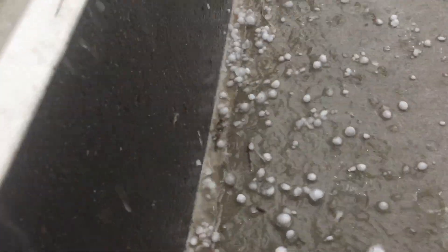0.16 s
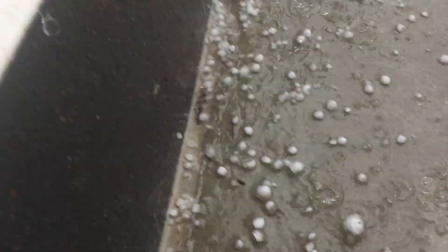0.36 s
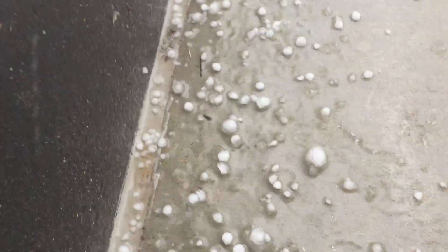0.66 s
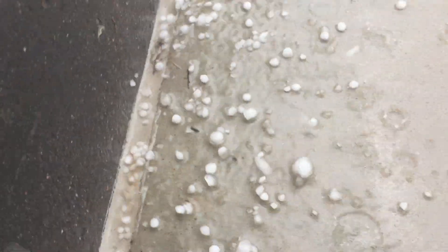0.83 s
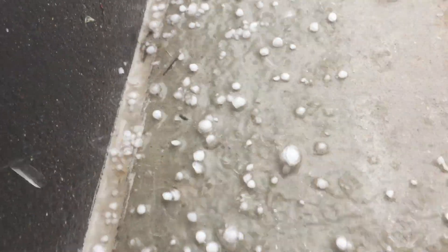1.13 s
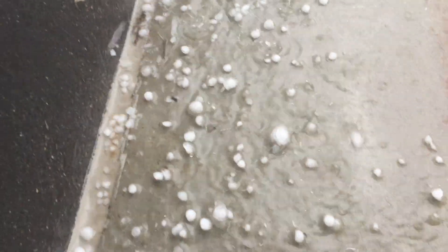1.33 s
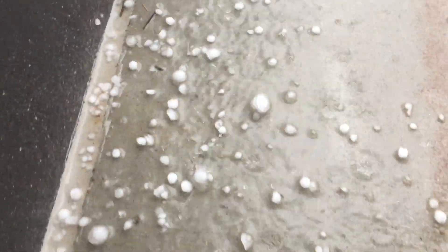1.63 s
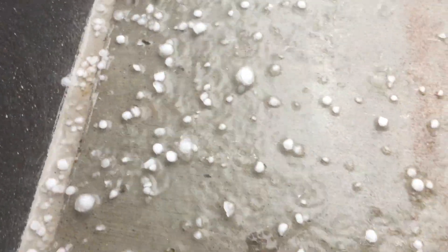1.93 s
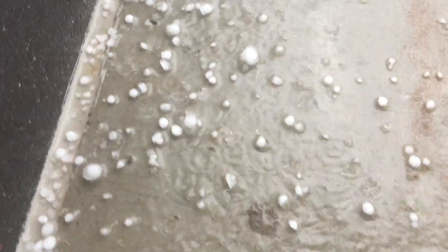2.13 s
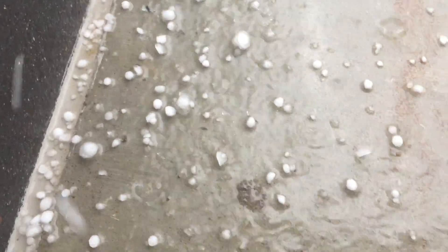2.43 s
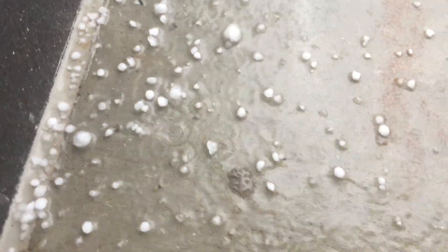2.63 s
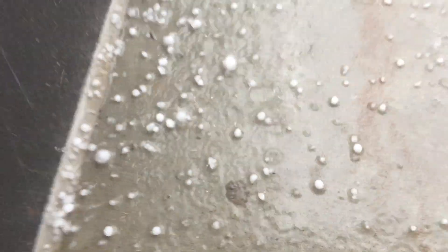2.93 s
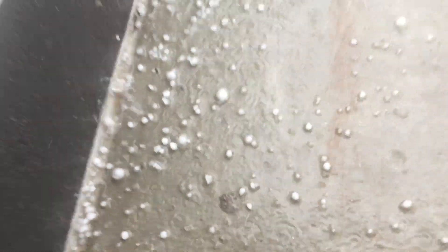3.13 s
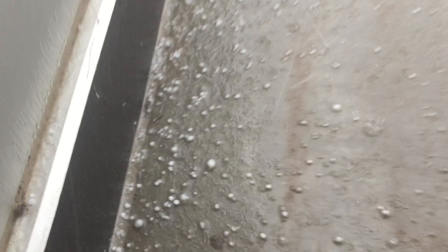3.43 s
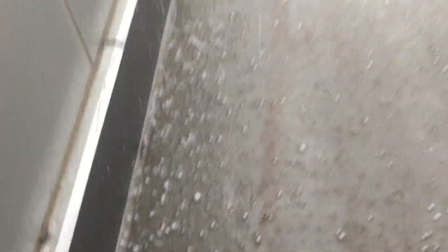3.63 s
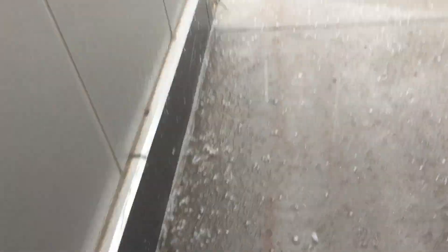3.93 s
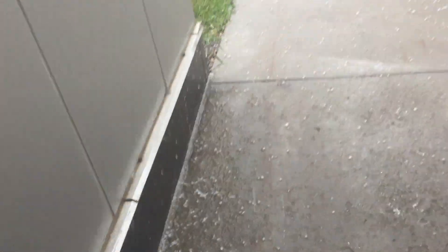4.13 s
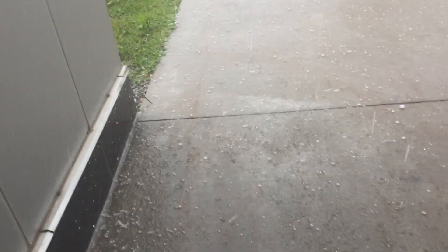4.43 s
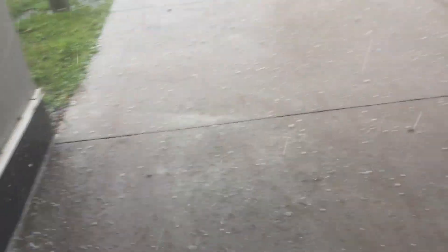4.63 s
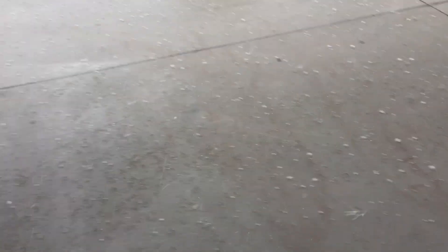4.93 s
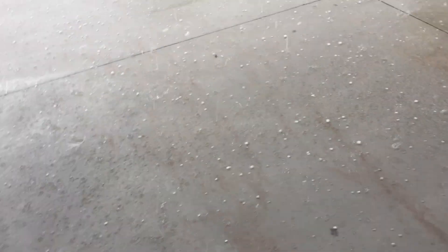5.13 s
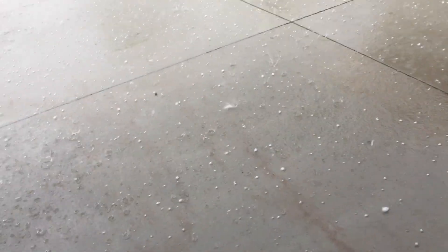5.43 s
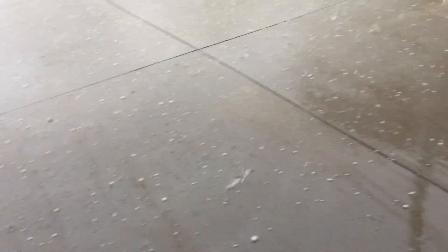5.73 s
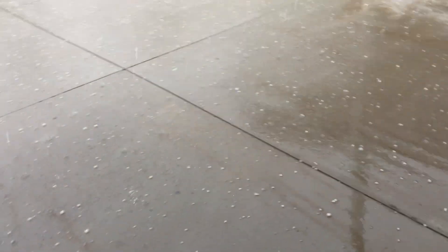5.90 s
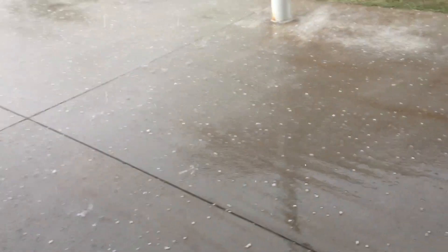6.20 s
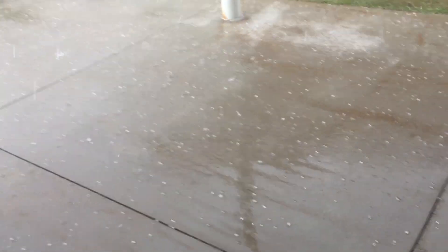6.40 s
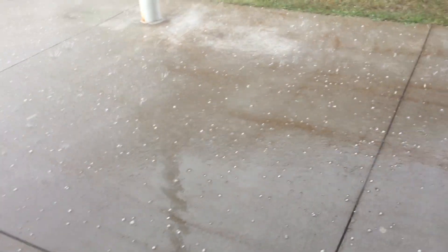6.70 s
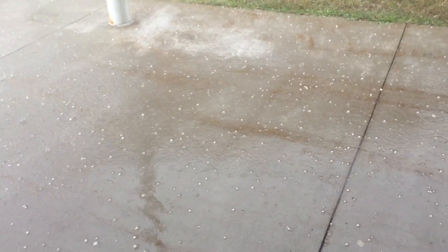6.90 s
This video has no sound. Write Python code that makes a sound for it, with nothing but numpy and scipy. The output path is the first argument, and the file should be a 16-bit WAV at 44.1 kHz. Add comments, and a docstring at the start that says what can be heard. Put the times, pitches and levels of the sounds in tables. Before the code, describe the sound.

A dry, close outdoor phone pickup of hail and heavy rain at a doorstep, lasting about 7 seconds. Throughout, countless distant stones merge into a crisp, grainy patter over rain hiss, swelling slightly. Nearby hailstones crack, tick and ping irregularly on wet concrete, with tiny splashes. Strong hollow sill clacks come at about 0.15-0.2 s, with more around 0.6 and 0.95 s. The loudest crack, at 1.8 s, brings a short, low door-panel thud and slightly overloads the microphone. Close hits cluster from 2.1 to 2.8 s. Low wind rumbles underneath; rough buffets press on the microphone from 2.8 to 4.1 s, strongest near 3.3-3.7 s, with a hard crack at 3.65 s. A metal post hums faintly on one fading note. After 4.4 s close hits gradually thin, near ticks recede, and brief soft wind puffs appear as rain continues to the end.

```python
"""Hail on a concrete walk and a door sill, in heavy rain, close to a phone microphone.
Near stones are decaying sines with noise cracks and splashes; sill modes ring with them, a door panel thuds once.
Far stones merge into a patter over shaped-noise rain; a metal post hums faintly as a decaying sine.
Wind on the microphone port is low noise with puffs and buffets; the loudest peaks softly overload the input."""
import sys
import numpy as np
from scipy.fft import rfft, irfft, next_fast_len
from scipy.io import wavfile
from scipy.ndimage import uniform_filter1d, map_coordinates

SR = 44100
rng = np.random.default_rng(int(sys.argv[2]) if len(sys.argv) > 2 else 0)


def generate_wav(sig):
    """Save sig (samples, or channels by samples) to the path in sys.argv[1] as 16-bit PCM at SR."""
    pcm = np.round(np.clip(np.atleast_2d(sig).T, -1, 1) * 32767).astype(np.int16)
    wavfile.write(sys.argv[1], SR, pcm)


N = 311346


def amp(db):
    """Amplitude ratio of a level in dB."""
    return 10 ** (np.asarray(db) / 20)


def unit(x):
    """x scaled to an RMS of one."""
    return x / np.sqrt(np.mean(x ** 2) + 1e-20)


def curves(rows):
    """One value per sample for each column after the time in seconds."""
    knot_s, *columns = np.transpose(rows)
    return [np.interp(np.arange(N) / SR, knot_s, column) for column in columns]


def wobble(rate_hz):
    """A smooth random curve through rate_hz normal draws a second."""
    knots = rng.standard_normal(int(N * rate_hz / SR) + 4)
    return map_coordinates(knots, [np.arange(N) * rate_hz / SR])


def filtered(x, response):
    """x times a response, a function of frequency in Hz."""
    size = next_fast_len(N + 8192)
    spectrum = rfft(x, size) * response(np.fft.rfftfreq(size, 1 / SR))
    return irfft(spectrum, size)[..., :N]


def coloured(x, points):
    """x shaped by (Hz, dB) points on a log axis, at unchanged power for white input."""
    point_hz, point_db = np.transpose(points)
    return filtered(x, lambda hz: unit(amp(np.interp(np.log(hz + 1), np.log(point_hz), point_db))))


def impacts(s, db, hz, crack_db, cycles, life_s, size):
    """Each stone rings for some cycles to -60 dB, cracks dull or bright, then scatters chips and water."""
    # Spectrum of shattering ice. Each row: frequency in Hz, relative density in dB.
    crack_points = [(300, -6.5), (1000, -7.5), (2500, 2), (6000, 2), (12000, -2.5), (16000, -7.5)]
    # Spectrum of scattering chips and water. Each row: frequency in Hz, relative density in dB.
    splash_points = [(500, -20), (1500, 4), (4000, 3.5), (9000, -7), (16000, -19)]
    bright_hz = 5560  # splits cracks into a dull and a bright part
    t = np.arange(size) / SR
    s, db, hz, crack_db = (np.asarray(column)[:, None] for column in (s, db, hz, crack_db))
    at = (np.round(s * SR).astype(int) + np.arange(size)).ravel()

    def mix(grains):
        """Overlap-add of the grains at their starts."""
        return np.bincount(at, grains.ravel(), N + size)[:N]

    ring = amp(db - 60 * t * hz / cycles) * np.sin(2 * np.pi * hz * t)
    crack_t60_s = life_s * amp(rng.normal(0, 4.4, hz.shape))  # some cracks are mere ticks
    crack = amp(db + crack_db - 60 * t / crack_t60_s) * rng.standard_normal(ring.shape)
    # small, high stones crack brighter
    tilt_db = 4.1 * np.log2(hz / 3500) + rng.normal(0, 5.2, hz.shape)
    dull = filtered(mix(crack * amp(-tilt_db / 2)), lambda f: 1 / (1 + (f / bright_hz) ** 4))
    bright = filtered(mix(crack * amp(tilt_db / 2)), lambda f: 1 - 1 / (1 + (f / bright_hz) ** 4))
    splash = amp(db - 12 - 60 * t / 0.032) * rng.standard_normal(ring.shape)
    return mix(ring) + coloured(dull + bright, crack_points) + coloured(mix(splash), splash_points)


def far_stones(count, spread_db, centre_hz, crack_db, life_s):
    """A random fall of smaller and farther stones, some louder than the rest, at unit RMS."""
    draw, scatter = rng.random((count, 2)), rng.standard_normal((count, 2))
    start_s = draw[:, 0] * N / SR
    db = -spread_db * np.log(1 - .96 * draw[:, 1])
    hz = np.clip(centre_hz * np.exp(.55 * scatter[:, 0]), 1000, 12000)
    cracks_db = crack_db + 3.4 * scatter[:, 1]
    return unit(impacts(start_s, db, hz, cracks_db, cycles=14, life_s=life_s, size=768))


def downpour():
    """Rain on wet concrete as patchy noise under far stones; the hiss swells more than the patter."""
    # Strength of the downpour. Each row: time in seconds, gain in dB.
    fall = [(0, -28), (.2, -29.5), (.25, -33.5), (.35, -35), (.41, -30), (.9, -30), (1.07, -32), (1.2, -30),
            (1.75, -28), (2.0, -35.5), (2.06, -28.5), (2.25, -31.5), (2.68, -27.5), (2.9, -31.5),
            (3.3, -29), (3.5, -33.5), (4.35, -29), (4.5, -30.5), (5.9, -29), (6.25, -30), (6.72, -28),
            (7.06, -30)]
    # Spectrum of the rain's patter. Each row: frequency in Hz, relative density in dB.
    patter_points = [(150, -49), (250, -10.5), (368, -4.5), (1180, -3.5), (1470, -2.5), (3820, -5.5),
                     (4850, -9.5), (6000, -15), (7800, -19), (13200, -120)]
    # Spectrum of the rain's hiss. Each row: frequency in Hz, relative density in dB.
    hiss_points = [(2500, -40), (5000, 5), (9000, 3.5), (15800, -2.5)]
    # The phone rises from the ground, close ticks recede. Each row: time in seconds, gain in dB.
    lift = [(3.5, 0), (5.5, -3)]
    fall_db = curves(fall)[0]
    swell_db = fall_db - fall_db.mean()
    patter_gain = amp(1.14 * wobble(25) - 0.07 * swell_db)
    patter = patter_gain * coloured(rng.standard_normal(N), patter_points)
    hiss_gain = amp(-7.5 + 0.22 * swell_db + 1.6 * wobble(40))
    hiss = hiss_gain * coloured(rng.standard_normal(N), hiss_points)
    flurry = amp(1.2 * wobble(9))
    stones = far_stones(count=2200, spread_db=5.5, centre_hz=2920, crack_db=-3, life_s=0.0071)
    stones = amp(-3.5) * flurry * stones
    # small ones close by tick sharply
    chips = far_stones(count=600, spread_db=4, centre_hz=4450, crack_db=2, life_s=0.0034)
    chips = amp(-9 + curves(lift)[0]) * chips
    return amp(fall_db) * (amp(-3) * patter + stones + chips + hiss)


def wind():
    """A lumpy rumble, short puffs, and bursts of eddies while a gust meets the port."""
    # Rumble of the gusts. Each row: time in seconds, level in dB.
    gusts = [(0, -32), (1.2, -35), (1.6, -41.5), (2.0, -34), (3.2, -33), (4.15, -37.5), (6.75, -40),
             (7.06, -29.5)]
    # Short low bumps. Each row: centre in seconds, gain in dB, half length to 1/e in seconds.
    puff_rows = [(4.405, -32, 0.013), (4.493, -35, 0.02), (5.353, -38.5, 0.066), (5.706, -26.5, 0.013),
                 (6.103, -32, 0.014), (6.145, -26, 0.0096), (6.414, -27, 0.0086), (6.477, -31, 0.022),
                 (6.864, -29, 0.016)]
    # Wind straight on the port. Each row: start in seconds, hold in seconds, dB at start, dB at end.
    buffets = [(2.823, 0.146, -24, -21), (3.336, 0.061, -11, -15), (3.471, 0.227, -16.5, -17.5),
               (3.726, 0.261, -21.5, -25), (4.022, 0.062, -27, -35)]
    # Spectrum of the rumble. Each row: frequency in Hz, relative density in dB.
    rumble_points = [(15, -45), (25, -39), (46, -4), (70, 1), (151, -3), (240, -8), (400, -20.5),
                     (520, -66), (880, -120)]
    # Spectrum of the eddies. Each row: frequency in Hz, relative density in dB.
    flutter_points = [(24, -45), (40, -22), (65, -2.5), (177, -0.5), (460, -10), (1120, -25), (1500, -43),
                      (1950, -58), (3300, -120)]
    split_hz, brightening = 370, .3  # above the split, eddies gain extra dB per dB of buffet
    t = np.arange(N) / SR
    rumble = unit(amp(2.44 * wobble(14)) * coloured(rng.standard_normal(N), rumble_points))
    eddies = unit(amp(3 * wobble(110)) * coloured(rng.standard_normal(N), flutter_points))
    low = filtered(eddies, lambda hz: 1 / (1 + (hz / split_hz) ** 4))
    puffs = sum(amp(db) * np.exp(-((t - s) / half_s) ** 2) for s, db, half_s in puff_rows)
    bursts = sum(buffet(t, *row) for row in buffets)
    high = (bursts / bursts.max()) ** brightening * amp(3.5) * (eddies - low)
    return (amp(curves(gusts)[0]) + puffs) * rumble + bursts * (low + high)


def buffet(t, start_s, hold_s, start_db, end_db):
    """Gain of one buffet: rise, hold, break off."""
    rise_db_per_s, drop_db_per_s = 395, 783
    end_s = start_s + hold_s
    held_db = np.interp(t, [start_s, end_s], [start_db, end_db])
    rise_db = rise_db_per_s * np.maximum(start_s - t, 0)
    drop_db = drop_db_per_s * np.maximum(t - start_s - hold_s, 0)
    return amp(held_db - rise_db - drop_db)


def post():
    """Now and then a stone sets a thin metal post humming on one note; the strongest ring prevails."""
    # Blows on the post. Each row: start in seconds, level before the wobble in dB.
    blows = [(-.1, -42), (.48, -35.5), (.85, -37), (2.85, -40), (3.95, -41), (5.1, -39.5)]
    hum_hz, t60_s = 1426, 2.5
    t = np.arange(N) / SR
    ring = np.max([amp(db - 60 * (t - s) / t60_s) * (t > s) for s, db in blows], axis=0)
    smooth_ring = uniform_filter1d(ring, size=400)
    return smooth_ring * amp(2 * wobble(12)) * np.sin(2 * np.pi * hum_hz * t)


def near_stones():
    """Stones at the doorstep; each rings the modes of the sill, by a level of its own if it strikes the sill."""
    # Stones on the concrete. Each row: start in seconds, ring peak in dB, ring in Hz, crack dB over the ring.
    concrete_stones = [(0.0106, -15, 3700, 5.5), (0.168, -8, 2640, -6), (0.219, -15.5, 3770, -0.5),
                       (0.371, -19, 2460, 4), (0.4100, -18, 2950, 5), (0.442, -14, 1880, -2),
                       (0.6712, -12.5, 3880, -8), (0.7189, -12.5, 7200, 6), (0.7995, -15, 3700, -1),
                       (0.8253, -1.5, 5250, -14.5), (0.8763, -7, 4270, -3), (1.0087, -14.5, 3630, 0),
                       (1.1294, -25.5, 4050, 13), (1.1824, -21, 5160, 9.5), (1.2428, -8.5, 2060, -1),
                       (1.379, -11.5, 3500, -2.5), (1.4385, -6.5, 5330, -1.5), (1.4645, -19.5, 9650, 12),
                       (1.4934, -10.5, 4000, -13), (1.545, -18, 5540, 5), (1.617, -10, 2470, -4),
                       (1.779, -18, 4200, 8), (1.8414, -17, 1890, 2), (2.0975, -3.5, 3540, -0.5),
                       (2.1115, -16, 1110, 0), (2.162, -23.5, 3120, 10), (2.2593, -12, 3450, 1),
                       (2.3776, -13.5, 2240, 2), (2.3825, -22, 5170, 12), (2.4773, -11.5, 2650, -11),
                       (2.6456, -6, 3800, -3.5), (2.7145, -5.5, 2900, 2), (2.732, -16.5, 2170, 8),
                       (2.7883, -11, 1700, 1.5), (2.834, -13, 3570, 3), (3.1223, -15, 3320, 5),
                       (3.22, -16, 2960, 6.5), (3.2412, -15, 2990, 6), (3.3104, -23, 2150, 7),
                       (3.4805, -20.5, 3900, 6.5), (3.6453, -0.5, 2530, 2.5), (3.6572, -4.5, 3550, -23),
                       (3.7924, -30.5, 2020, 17), (3.8167, -12, 3450, -5), (3.9786, -8.5, 3830, -7),
                       (4.0928, -8, 3460, -24), (4.1616, -8.5, 4070, -5.5), (4.2664, -9, 8360, -5),
                       (4.3576, -8.5, 3000, -6.5), (4.4118, -9, 4570, -10), (4.6503, -16, 2540, 0),
                       (4.66, -15, 2580, -4), (4.6899, -14.5, 3640, 7), (4.8242, -9, 4000, 4.5),
                       (4.8874, -16.5, 5200, -3), (4.9483, -11.5, 1600, -3), (5.0375, -9, 4400, -5),
                       (5.5825, -12, 3600, -17), (5.748, -13.5, 4000, -6), (5.8365, -7, 9350, -8),
                       (5.885, -7, 3420, -11), (6.319, -14.5, 4160, -13), (6.3455, -13.5, 5380, -12),
                       (6.68, -10, 2820, 2), (6.777, -16, 2840, -9)]
    # Stones on the door sill. Each row: start in seconds, ring peak in dB, ring in Hz,
    # crack dB over the ring, blow to the sill in dB.
    sill_stones = [(0.1545, 2, 1870, 1, 1.5), (0.202, 2, 6100, -1, -3), (0.428, -9, 4200, 3, -17),
                   (0.6002, -8, 1420, -3.5, -30), (0.9309, -1, 5600, 3, -6),
                   (0.9645, -6.5, 2390, 10.5, -9.5), (1.816, 8.5, 3430, 3.5, 0.5),
                   (2.6603, -16, 2760, 11, -17), (3.2993, -5.5, 1850, -2, -10.5),
                   (3.3552, -13.5, 4370, 7, -12), (3.618, -11.5, 5800, 6, -21),
                   (4.3886, -1.5, 4500, -14, -19), (5.0934, -7.5, 2300, -16, -13)]
    # Typical modes of the hollow sill. Each row: frequency in Hz, level in dB, T60 in seconds.
    sill_modes = [(1116, -9.5, 0.046), (1268, -6.5, 0.025), (1478, -9, 0.037), (2010, -17, 0.029),
                  (2447, -1, 0.018), (3680, -23, 0.017), (4540, -31, 0.018)]
    shake_db = -28  # blow to the sill by a stone on the concrete, relative to its own peak
    beside = [(*row, row[1] + shake_db) for row in concrete_stones]
    s, db, hz, crack_db, blows_db = np.transpose(sill_stones + beside)
    sill, t = np.zeros(N + SR), np.arange(SR // 5) / SR
    mode_hz, mode_db, t60_s = np.transpose(sill_modes)[:, :, None]
    for start_s, blow_db in zip(s, blows_db):
        # each spot of the sill sounds a little different
        detune = 1 + 0.05 * rng.standard_normal(mode_hz.shape)
        spot_db = mode_db + rng.normal(0, 3, mode_db.shape)
        decay = amp(blow_db + spot_db - 60 * t / t60_s)
        modes = decay * np.sin(2 * np.pi * mode_hz * detune * t)
        sill[round(start_s * SR):][:len(t)] += modes.sum(axis=0)
    return impacts(s, db, hz, crack_db, cycles=27, life_s=0.008, size=2048) + sill[:N]


def door():
    """The biggest stone thuds in the door panel: one low, short ring with a soft onset."""
    # The row: level before the swell in dB, frequency in Hz, T60 in seconds, swell time constant in seconds.
    thud = (-16, 250, .19, .012)
    start_s = 1.818
    db, hz, t60_s, swell_s = thud
    t = np.maximum(np.arange(N) / SR - start_s, 0)
    return amp(db - 60 * t / t60_s) * (1 - np.exp(-t / swell_s)) * np.sin(2 * np.pi * hz * t)


def scene():
    """All sources; a 750 Hz high-pass on near stones, which are too small to radiate bass."""
    stones = filtered(near_stones(), lambda hz: (1j * hz / (1j * hz + 750)) ** 2)
    return (stones + downpour() + wind() + post() + door())[None]


def record(dry):
    """Dips of the phone's case and port, soft overload of the input, band limit."""
    # Dips of the case and port. Each row: centre in Hz, width in Hz, gain at the centre in dB.
    notches = [(4920, 350, -5), (7620, 860, -3), (10460, 680, -8)]
    top_hz, ceiling = 15750, .67

    def dip(f, hz, width_hz, db):
        """Response of one resonant dip."""
        band = 1j * f * width_hz
        return 1 - (1 - amp(db)) * band / (hz * hz - f * f + band)

    x = filtered(dry, lambda f: np.prod([dip(f, *row) for row in notches], axis=0) * (f < top_hz))
    x = x / (1 + np.abs(x / ceiling) ** 6) ** (1 / 6)
    return filtered(x, lambda hz: hz < top_hz)


dry = scene()
out = record(dry)
generate_wav(out)
```